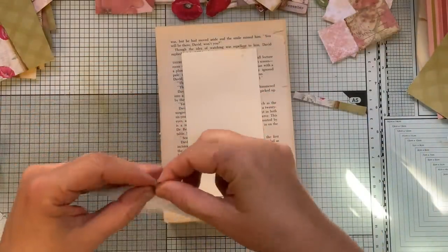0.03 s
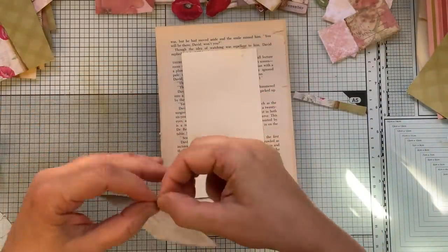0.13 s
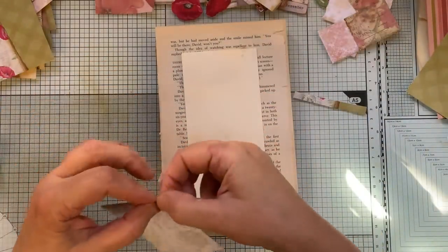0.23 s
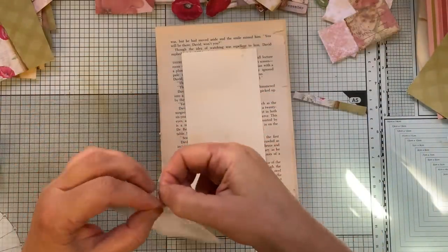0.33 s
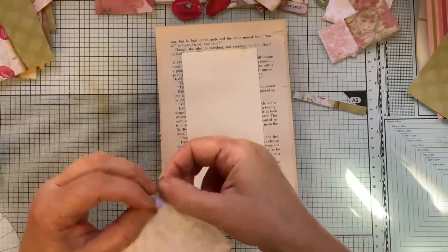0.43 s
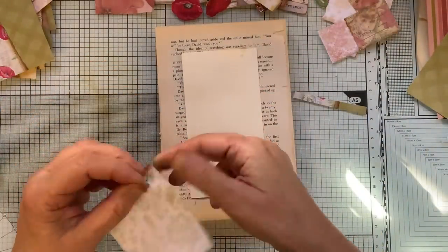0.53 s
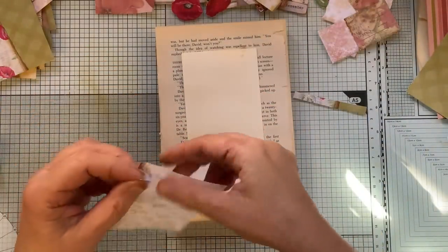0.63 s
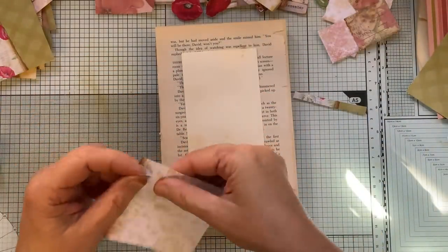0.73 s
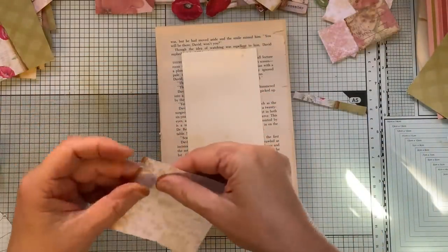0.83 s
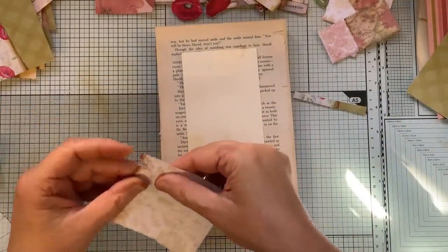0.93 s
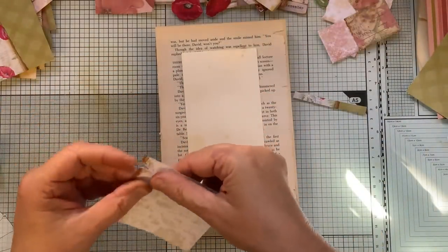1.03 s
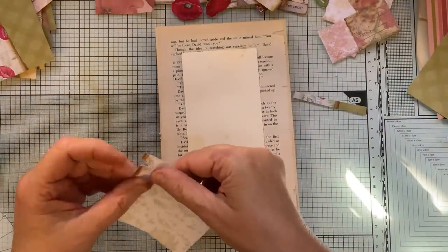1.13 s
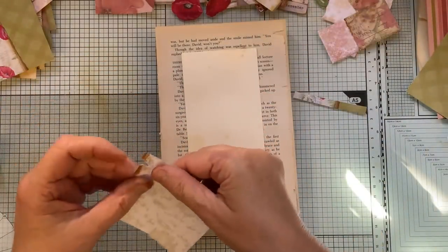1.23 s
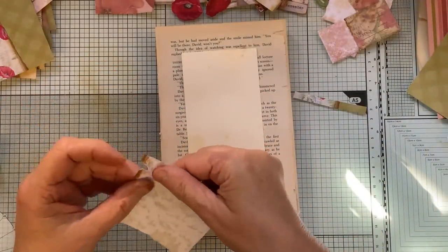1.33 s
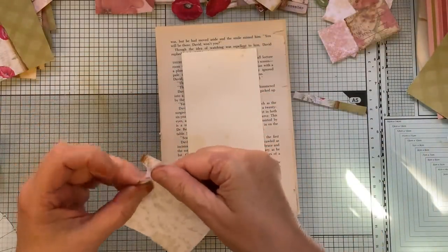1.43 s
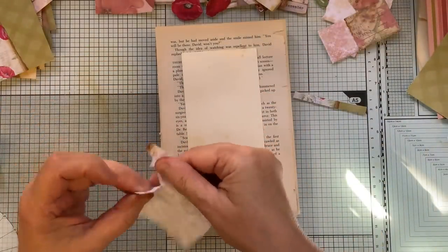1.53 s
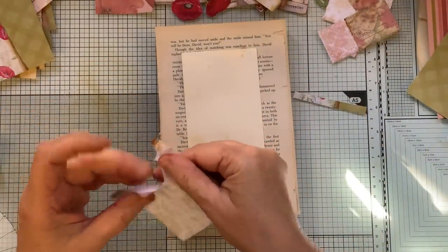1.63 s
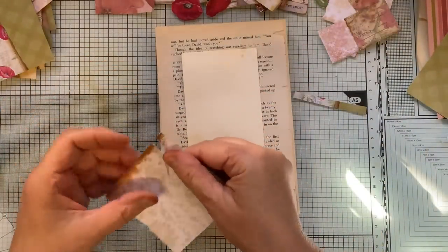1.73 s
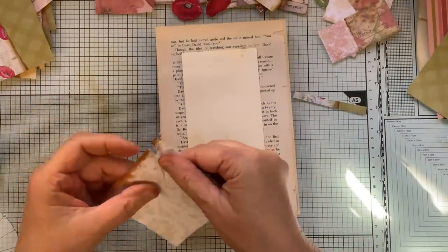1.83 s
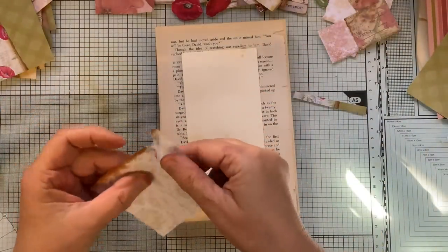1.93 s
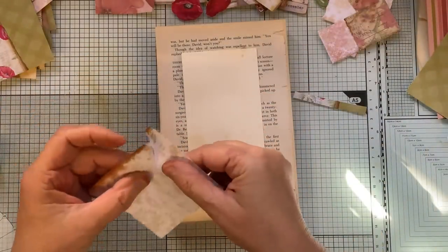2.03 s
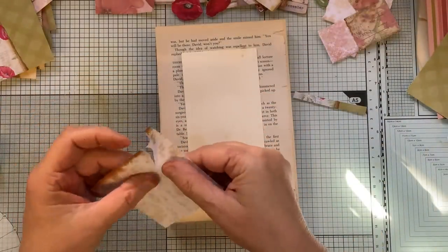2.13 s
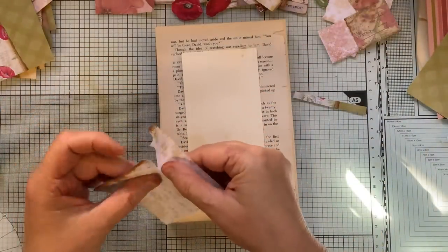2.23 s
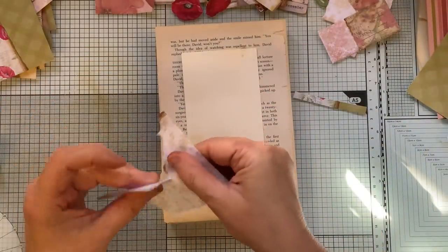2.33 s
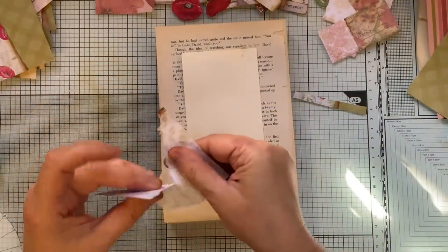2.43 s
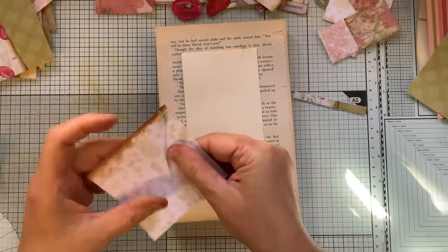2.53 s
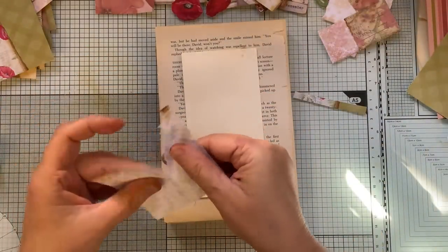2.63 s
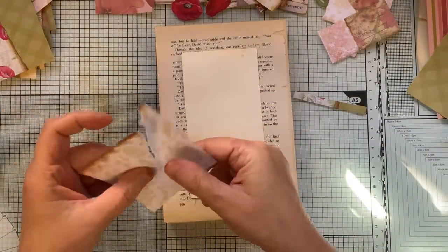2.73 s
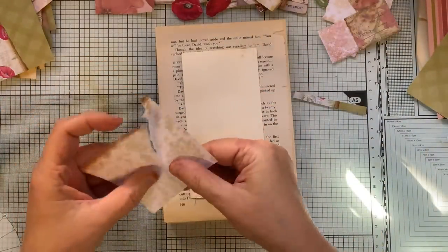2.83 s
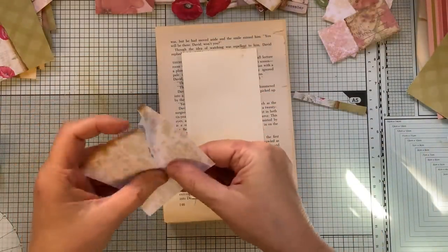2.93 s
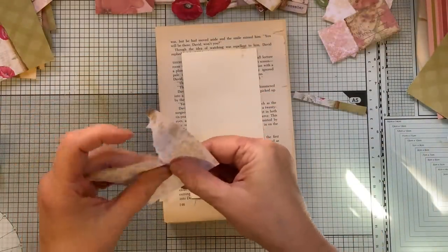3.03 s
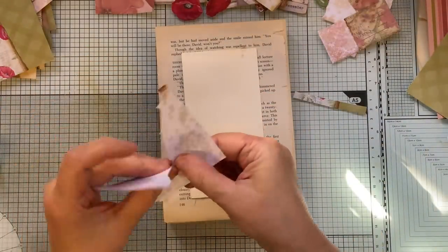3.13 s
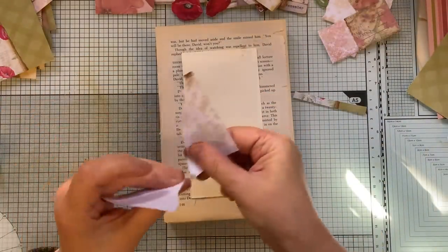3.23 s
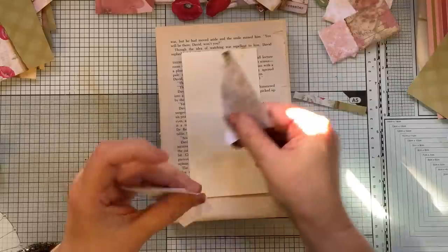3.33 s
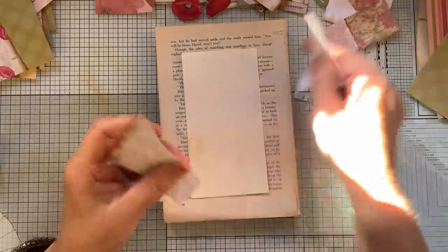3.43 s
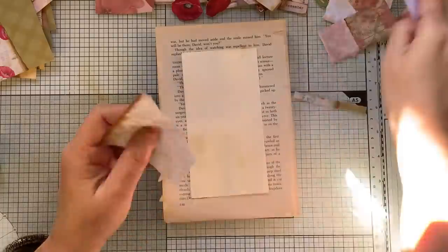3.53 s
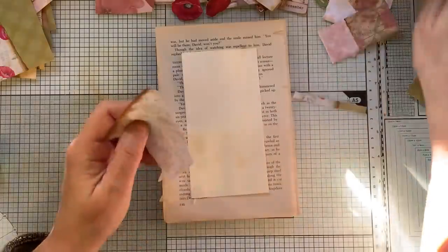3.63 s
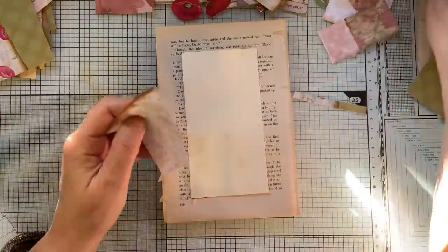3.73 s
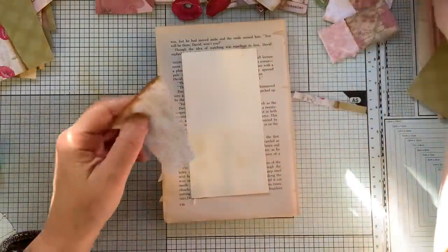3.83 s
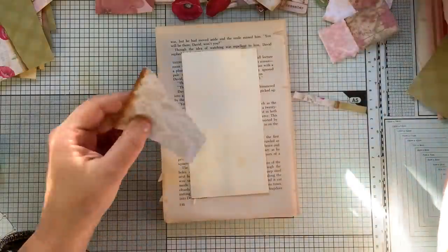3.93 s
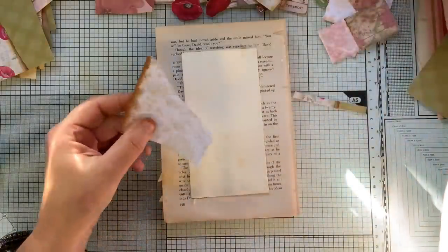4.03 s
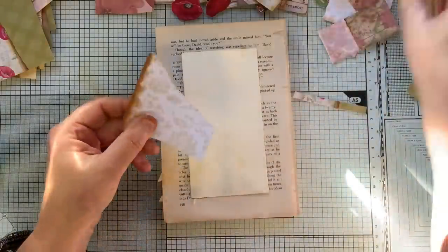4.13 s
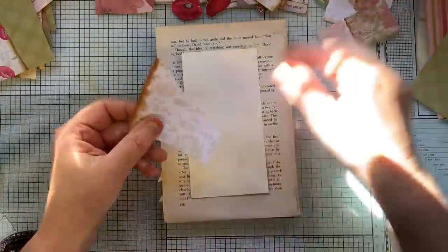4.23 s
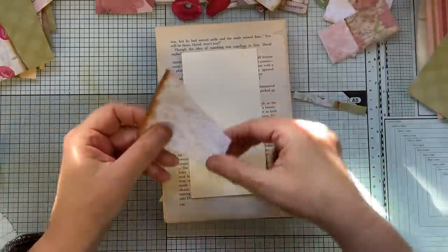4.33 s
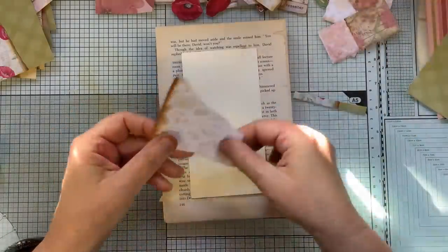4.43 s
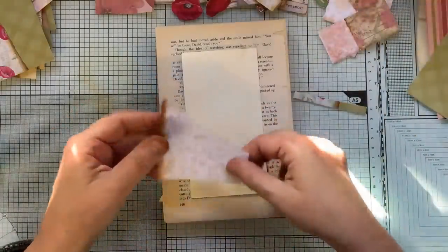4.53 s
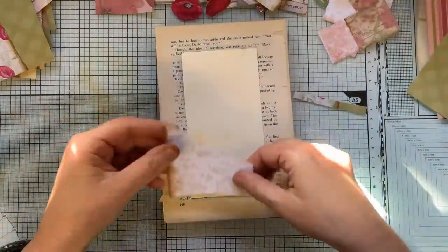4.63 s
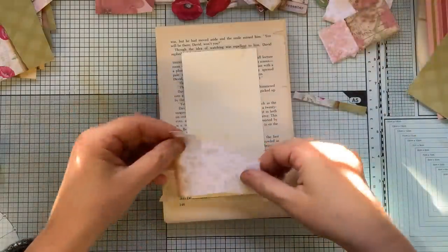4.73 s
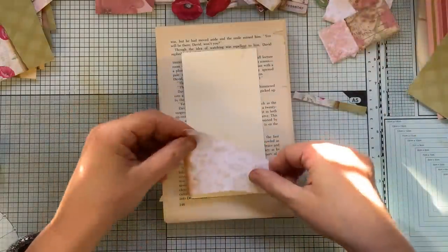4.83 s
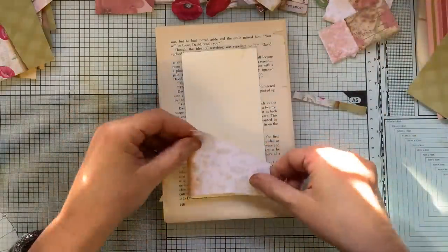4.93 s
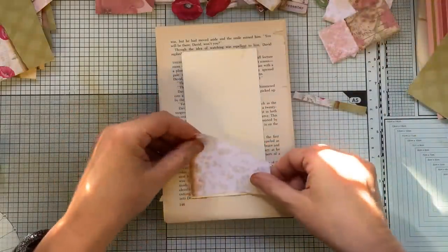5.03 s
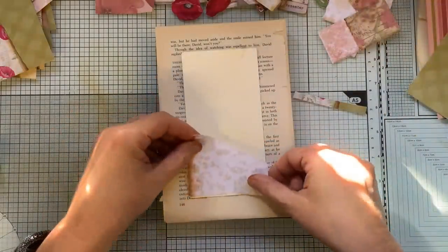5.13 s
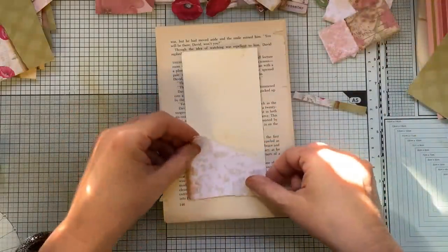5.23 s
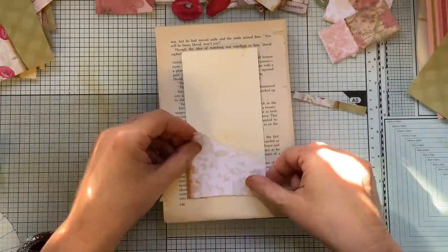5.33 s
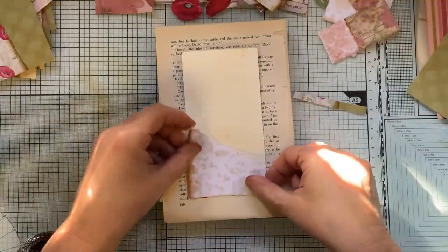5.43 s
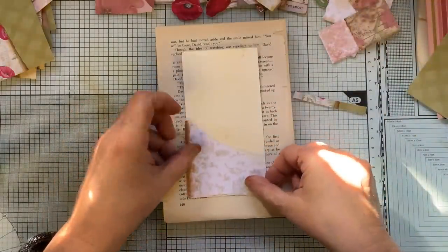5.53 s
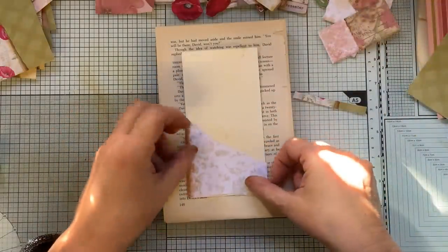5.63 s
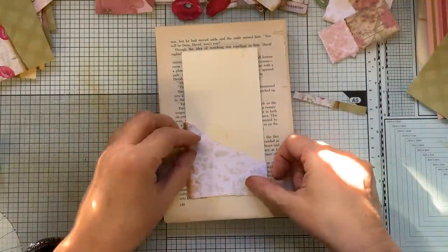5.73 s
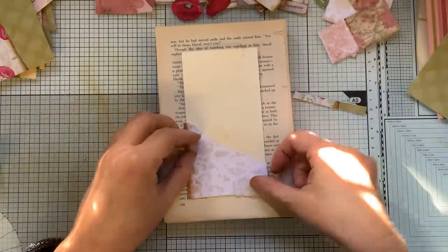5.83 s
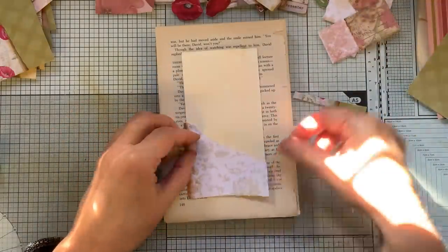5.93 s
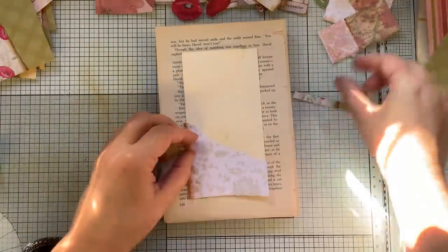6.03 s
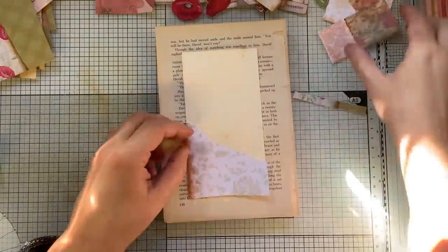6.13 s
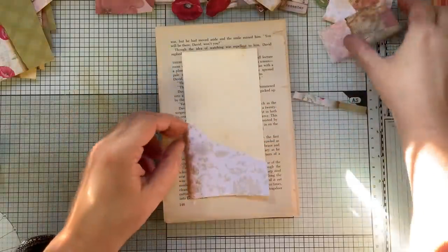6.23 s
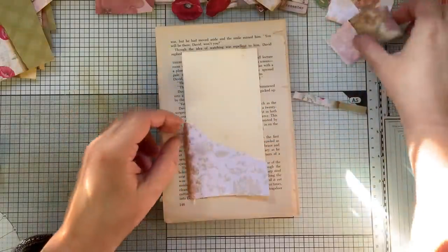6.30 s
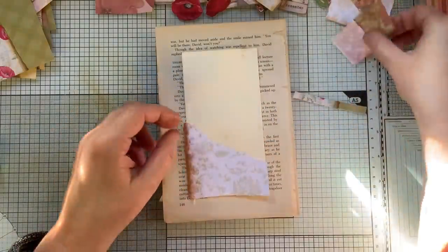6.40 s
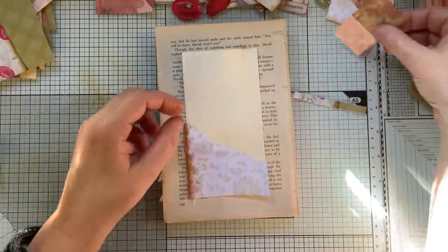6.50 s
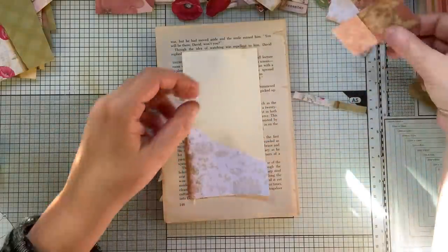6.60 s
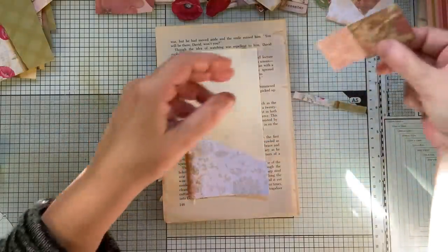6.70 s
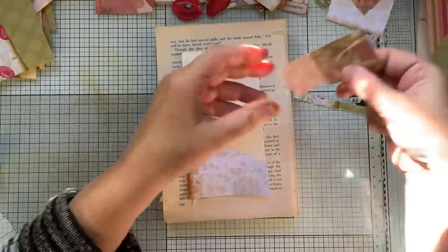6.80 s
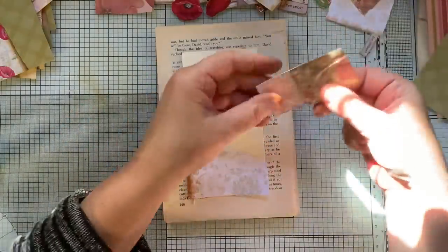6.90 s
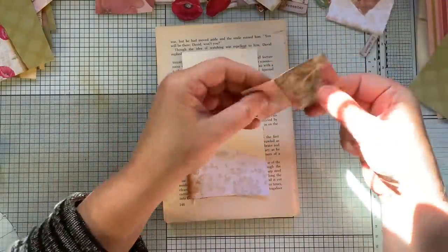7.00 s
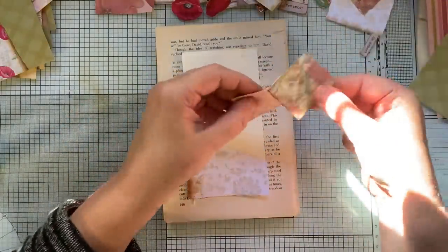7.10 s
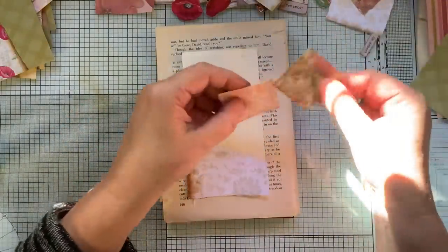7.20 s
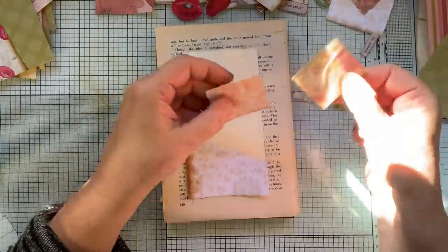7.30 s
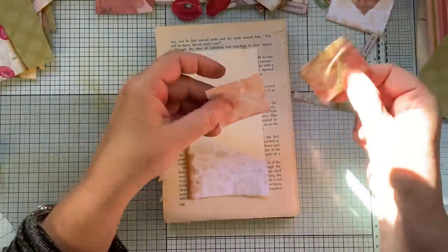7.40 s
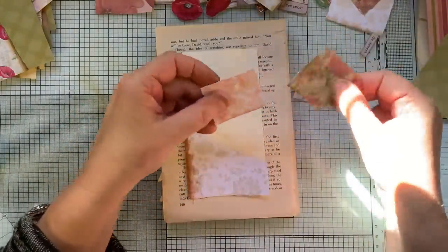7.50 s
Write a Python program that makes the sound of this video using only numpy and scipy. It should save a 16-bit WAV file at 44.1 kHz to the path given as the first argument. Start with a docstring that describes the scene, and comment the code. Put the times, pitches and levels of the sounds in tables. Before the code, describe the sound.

Close, crisp paper tearing in short uneven rips with sharp crease snaps, then soft rustling, a few dull table bumps and one last small rip.

```python
"""A faint room hum and a light rustle, then hands tear a scrap of paper in short rips, lay it down and
pick up others, close under a phone above a craft table. Fibres break as bursts of filtered noise,
creases snap as short ringing cracks, and the flexing sheet flaps low over a rumble of sleeve and table.
Wrist and scraps bump the table, heard as decaying sine modes; short noise tails spill from the walls."""
import sys
import numpy as np
from scipy import signal
from scipy.fft import rfft, irfft
from scipy.io import wavfile
from scipy.ndimage import uniform_filter1d

SR = 44100
rng = np.random.default_rng(int(sys.argv[2]) if len(sys.argv) > 2 else 0)


def waveform_to_disk(signal):
    """Save audio, clipped to [-1, 1], as 16-bit WAV at the path in sys.argv[1]."""
    frames = np.transpose(np.atleast_2d(signal))
    scaled = np.clip(frames, -1, 1) * 32767
    samples = np.round(scaled).astype(np.int16)
    wavfile.write(sys.argv[1], SR, samples)


def linear_from_db(decibels):
    """Turn decibels (scalar or array-like) into linear amplitude factors; 0 gives 1."""
    return 10 ** (np.asarray(decibels, float) / 20)


N = 333396
T = np.arange(N) / SR
STEPS = T[::32]  # gesture levels are worked out on this coarser clock
HZ = np.fft.rfftfreq(N, 1 / SR) + 1e-3  # kept above zero for the logarithms


def noise(size=N):
    """Two unrelated noises: the straight path and what scatters off hands and table."""
    return rng.standard_normal((2, size))


def over_frequency(points, column=1):
    """One column of a frequency table, read on a log axis."""
    p = np.array(points, float)
    return np.interp(np.log(HZ), np.log(p[:, 0]), p[:, column])


def over_time(points):
    """Columns of a time table, one value a sample."""
    s, *columns = np.array(points, float).T
    return [np.interp(T, s, c) for c in columns]


def colour(x, points, skirt_db=30):
    """Shape a sound by (Hz, dB) points, falling by skirt_db per octave outside; rms 1."""
    below = np.maximum(np.log2(points[0][0] / HZ), 0)
    above = np.maximum(np.log2(HZ / points[-1][0]), 0)
    gain = linear_from_db(over_frequency(points) - skirt_db * (below + above))
    y = irfft(rfft(x) * gain, N)
    return y / np.std(y)


def band(x, hz, width):
    """A resonance, gain 1 at its centre."""
    b, a = signal.iirpeak(min(hz, .45 * SR), max(hz / width, .3), SR)
    return signal.lfilter(b, a, x)


def walk(rate):
    """Random levels held 1 / rate s and slewed twice; spread near 1."""
    k = int(SR / rate)
    held = np.repeat(rng.standard_normal(N // k + 1), k)
    slewed = uniform_filter1d(uniform_filter1d(held, k), k)
    return 1.2 * slewed[:N]


def together(*levels_db):
    """Level of several sounds heard at once: their powers add."""
    return 10 * np.log10(sum(10 ** (db / 10) for db in levels_db))


def swell(s, length, from_db, to_db, attack_s, fade_s):
    """Level of one gesture: a quick rise, a drift while it lasts, a fade; times are for 60 dB."""
    drift = np.interp(STEPS, [s, s + length], [from_db, to_db])
    rise = 60 * np.maximum(s - STEPS, 0) / attack_s
    fade = 60 * np.maximum(STEPS - s - length, 0) / fade_s
    return drift - rise - fade


def room():
    """Still air as noise with a low rumble, and a mains hum of steady tones under wavering narrow noise."""
    # Air of the room. Each row: Hz, relative dB.
    air_tone = [(18, -41.5), (30, -11), (55, 1.5), (101, -2), (257, -25), (1900, -30), (2150, -50.5),
                (2560, -39), (2970, -28.5), (7590, -40.5), (11000, -38.5), (14300, -64), (22000, -120)]
    # Hum partials. Each row: Hz, level in dB, width in Hz of each of the two resonances in series.
    hum_tones = [(100.6, -67.5, 19), (203, -80, 14)]
    air = colour(noise(), air_tone) * linear_from_db(-66 + walk(3))
    hum = 0
    for hz, db, width in hum_tones:
        waver = band(band(noise(), hz, width), hz, width)
        tone = np.sin(2 * np.pi * hz * T) + 1.5 * waver / np.std(waver)
        hum = hum + linear_from_db(db + 1.3 * walk(6.7)) * tone
    return air + hum


def bumps():
    """Each blow rings the table top, whose pitch sags a little; hard blows favour the upper modes."""
    # Wrist and scraps on the table. Each row: start in seconds, relative level in dB,
    # hardness in dB per octave, damping by the hand 0-1.
    blows = [(5.968, -57, 12, 0.31), (6.095, -50.5, 16, 0.83), (6.119, -46.5, -16.5, 0.22),
             (6.222, -31, 1.5, 0.44), (7.03, -29, 3.5, 0), (7.104, -30.5, 1.5, 0.65)]
    # Modes of the table top. Each row: starting Hz, relative dB, undamped 60 dB decay in seconds.
    modes = [(78.9, -0.5, 0.25), (114, -2.5, 0.24), (162, 6.5, 0.082), (260.4, -6, 0.12),
             (294.6, 0.5, 0.14), (400, -20.5, 0.11), (681, -11, 0.034)]
    out = np.zeros(N)
    for s, db, hard_db, damp in blows:
        t = np.maximum(T - s, 0)
        sagging = t * (1 - 0.43 * np.minimum(t, .4))
        for hz, mode_db, t60 in modes:
            damped_t60 = t60 * (1 - np.clip(damp, 0, .9))
            fall = (1 - np.exp(-t / 0.0025)) * np.exp(-np.log(1000) * t / damped_t60)
            level = linear_from_db(db + mode_db + hard_db * np.log2(hz / 160))
            out += level * np.sin(2 * np.pi * hz * sagging) * fall
    return out


def breaks(per_s, spread_db, fade_s):
    """Envelope of fibres giving way at random, a few far louder, each dying quickly; rms 1."""
    when, how_big = rng.random((2, N))
    size = (when < per_s / SR) * linear_from_db(-spread_db * np.log(1 - .985 * how_big))
    e = signal.lfilter([1], [1, -np.exp(-1 / (fade_s * SR))], size)
    return e / np.sqrt(np.mean(e ** 2))


def patches(x, hz, count, swing_db, per_s):
    """Narrow resonances of the bent sheet round a centre, trading strength as the fingers reshape it."""
    gains = np.array([linear_from_db(swing_db * walk(per_s)) for _ in range(count)])
    gains = gains / np.sqrt(np.mean(gains ** 2, axis=0))
    centres = hz * 2 ** np.linspace(-.27, .27, count)
    out = 0
    for f, gain in zip(centres, gains):
        width = 1.2 * f / count
        out = out + band(band(x, f, width), f, width) * gain
    return out


def effort():
    """Level of all strokes of tearing and rubbing heard together."""
    # Each row: start in seconds, length in seconds, relative dB at the start, at the end,
    # time in seconds to fade by 60 dB.
    strokes = [(0.183, 0.083, -44, -56.5, 0.12), (0.261, 0.054, -51, -27, 0.12),
               (0.384, 0.0063, -47.5, -37, 0.18), (0.512, 0.046, -62, -53, 0.16),
               (0.631, 0.049, -51, -59.5, 0.09), (0.695, 0.019, -47, -41, 0.18),
               (.788, 0.0097, -51, -48, 0.18), (0.876, 0.055, -47, -54.5, 0.44),
               (1.112, 0.022, -55, -47, 0.063), (1.288, 0.0024, -42.5, -31.5, 0.025),
               (1.327, 0.013, -32, -33.5, 0.51), (1.38, 0.063, -32, -19.5, 0.079),
               (1.667, 0.061, -50, -43, 0.057), (1.749, 0.12, -53.5, -45.5, 0.035),
               (1.889, 0.0068, -42, -45, 0.038), (1.907, 0.053, -57.5, -49, 0.41),
               (2.071, 0.083, -51.5, -47, 0.15), (2.176, 0.035, -27.5, -25, 0.026),
               (2.225, .036, -21, -21, 0.057), (2.359, 0.01, -47, -39, 0.037),
               (2.464, 0.032, -55, -44, 0.025), (2.513, 0.017, -52.5, -47, 0.31),
               (2.559, 0.021, -48, -42.5, 0.19), (2.684, 0.1, -49, -47.5, 0.23),
               (2.839, 0.028, -59, -54, 0.55), (2.96, 0.038, -51, -30.5, 0.22),
               (3.04, 0.027, -43.5, -37.5, 0.062), (3.089, 0.063, -27, -19, 0.023),
               (3.238, 0.12, -48.5, -42.5, 0.13), (3.376, 0.071, -34.5, -46, 1),
               (3.595, 0.037, -52, -43, 0.57), (3.704, 0.019, -56, -42.5, 0.5),
               (3.885, 0.019, -50, -54.5, 0.34), (4.064, 0.02, -56.5, -57, 0.5),
               (4.27, 0.12, -47, -48.5, 0.039), (4.514, 0.011, -64, -62.5, 0.45),
               (4.613, 0.03, -55.5, -53.5, 0.24), (4.733, 0.014, -57.5, -51.5, 0.38),
               (4.886, 0.076, -64.5, -65, 0.094), (4.991, 0.07, -50.5, -48, 0.57),
               (5.298, 0.038, -59.5, -52.5, 1), (5.471, 0.0034, -42, -37, 0.048),
               (5.516, 0.0063, -55.5, -54.5, 0.26), (5.673, 0.0056, -66.5, -65, 0.4),
               (6.148, 0.1, -48, -52, .1), (6.23, 0.0073, -30, -25.5, 0.048),
               (6.269, 0.12, -53, -57.5, 0.11), (6.453, 0.15, -64.5, -62.5, 0.41),
               (6.829, 0.086, -58, -50, 0.13), (7.027, 0.031, -55, -58.5, 0.058),
               (7.064, 0.014, -43.5, -36, 0.054), (7.113, 0.13, -57, -58.5, .4),
               (7.392, 0.07, -64, -48, 0.31)]
    swells = [swell(s, length, from_db, to_db, 0.025, fade_s)
              for s, length, from_db, to_db, fade_s in strokes]
    return np.interp(T, STEPS, together(*swells))


def flexing():
    """Levels of the flapping as the whole sheet flexes, and of the rumble that comes with it."""
    # Each row: start in seconds, length in seconds, flapping in relative dB,
    # sleeve and table rumble in dB above it, time in seconds to fade by 60 dB.
    flexes = [(0, 0.036, -62.5, -3, 0.1), (0.188, 0.085, -54.5, -14, 0.44),
              (0.283, 0.06, -47.5, -8.5, 0.24), (0.375, 0.015, -41.5, -14.5, 0.081),
              (0.42, 0.0036, -36, -21, 0.13), (0.505, 0.039, -49, -13.5, 0.13),
              (0.643, 0.013, -40.5, -14.5, 0.056), (0.687, 0.011, -40.5, -5.5, 0.26),
              (0.788, 0.055, -56.5, -1, 0.073), (0.967, 0.019, -64, 2, 0.13), (1.299, 0.077, -52, -5.5, .2),
              (1.391, 0.06, -43.5, -12.5, 0.26), (1.538, 0.022, -38, -7, 0.1),
              (1.67, 0.038, -60.5, -4, 0.2), (1.775, 0.0044, -50, -14, 0.17),
              (1.857, 0.048, -49.5, -4, 0.19), (2.054, 0.0057, -65, 5.5, 0.27),
              (2.183, 0.12, -47.5, -16, 0.083), (2.357, 0.037, -49, -3.5, 0.43),
              (2.411, 0.13, -55, -3, 0.4), (2.576, 0.021, -46.5, -2, 0.17), (2.66, 0.04, -60, 0, 0.93),
              (2.96, 0.029, -54.5, -1.5, 1), (3.148, 0.0047, -41, -3.5, 0.042),
              (3.345, 0.035, -42, -5.5, 0.19), (3.62, 0.009, -67, 6, 0.36), (4.043, 0.12, -66, 4.5, 0.54),
              (4.269, 0.018, -63, 2.5, 0.99), (5.045, 0.021, -76, 11.5, 0.39),
              (6.101, 0.0068, -54.5, 6.5, 0.22), (6.218, 0.014, -51, 6.5, 0.17),
              (6.61, 0.025, -67, 5.5, 0.15), (6.803, 0.016, -61.5, 9.5, 0.23),
              (7.024, 0.028, -58.5, 17, 0.67), (7.098, 0.29, -72.5, 14, 0.89)]
    still_db = -81
    flaps = [swell(s, length, db, db, 0.035, fade_s) for s, length, db, _, fade_s in flexes]
    rumbles = [f + row[3] for f, row in zip(flaps, flexes)]
    return [np.interp(T, STEPS, together(still_db, *layer)) for layer in (flaps, rumbles)]


def rumble(level_db):
    """Sleeve and table rumble: low noise of unsteady level."""
    # Each row: Hz, relative dB.
    rumble_tone = [(140, -1), (250, -0.5), (400, -4)]
    return colour(noise() * linear_from_db(2 * walk(28)), rumble_tone) * linear_from_db(level_db)


def flap(level_db):
    """The sheet flaps: low noise with slow, sparse breaks."""
    # Each row: Hz, relative dB.
    flap_tone = [(380, 1), (500, 5), (700, -2), (950, -6.5)]
    return colour(noise() * (.5 + 0.99 * breaks(70, 1.3, 0.0092)), flap_tone) * linear_from_db(level_db)


def sheet(level_db, fibres, jerks):
    """Middle rustle: the breaking fibres shake the resonances of the sheet."""
    # Each row: Hz, relative dB.
    sheet_tone = [(600, -22.5), (900, -1), (1400, 7), (1700, 7), (2200, 2.5)]
    shaken = noise() * (0.52 + 0.54 * fibres) * jerks
    middle = sum(patches(shaken, hz, count=4, swing_db=5, per_s=18) for hz in (720, 1170, 1900))
    return colour(middle, sheet_tone) * linear_from_db(level_db)


def crackle(level_db, bright_db, fibres, jerks):
    """Tearing and rubbing: breaks over smooth noise, in five bands that share some of their breaks."""
    # Each row: Hz, relative dB.
    paper_tone = [(2000, -8), (3000, -5), (4000, -2.5), (5500, 2.5), (8000, 1), (11500, 3.5), (14000, 5.5),
                  (15600, 1)]
    tearing = np.clip((level_db + 75) / 35, .5, 1)  # light rubbing is smooth, hard tearing is grainy
    top = 0
    for hz in (2722, 3680, 6800, 8866, 15400):
        grain = .4 + tearing * (.7 * fibres + .5 * breaks(400, 4.5, .0006))
        tilt_db = 1.18 * bright_db * np.clip(np.log2(hz / 6300), -.6, .6)
        part = patches(noise() * grain, hz, count=8, swing_db=6, per_s=20)
        top = top + part * linear_from_db(tilt_db) / np.sqrt(hz)
    return colour(top * jerks, paper_tone) * linear_from_db(level_db + 3.5)


def snaps():
    """Each crease: a broad crack, a short ring of the sheet and a duller body that lasts longer."""
    # Creases that snap. Each row: start in seconds, crack peak in relative dB, body in dB above it,
    # ring in Hz, 60 dB fade of crack and ring in seconds (held to at least 0.003).
    creases = [(0.182, -30.5, -24, 8300, 0.096), (0.3198, -15, -24, 6500, 0.012),
               (0.417, -7.5, -40, 6530, 0.017), (0.517, -28.5, -17, 3460, 0.026),
               (0.632, -23.5, -14, 5200, 0.0062), (0.6858, -25, 3.5, 4870, 0.0048),
               (0.7019, -9.5, -15.5, 5470, 0.025), (1.296, -9.5, -39, 7400, 0.04),
               (1.311, -14, -36, 7000, 0.008), (1.3566, -14, -21, 3000, 0.014),
               (1.444, -9, -32, 5800, 0.012), (1.4535, 3, -39, 3350, 0.016),
               (1.5356, -17.5, -7.5, 4400, 0.024), (1.5468, -16.5, -29, 6760, 0.0071),
               (1.7735, -22, -9.5, 6840, 0.023), (2.1767, -8, -40, 7640, 0.023),
               (2.2228, 0, -34, 6800, 0.029), (2.2724, 2, -30, 7300, 0.023),
               (2.3413, -18.5, -27, 7840, 0.02), (2.3583, -21, -16, 3380, 0.042),
               (2.4117, -18, -14, 5900, 0.024), (2.5272, -13.5, -26, 8600, 0.012),
               (2.5633, -26.5, -1, 5880, 0.0098), (2.9935, -25, -40.5, 7400, 0.027),
               (3.0746, -6, -59, 10500, 0.036), (3.0944, -15, -37, 6000, 0.0071),
               (3.1162, -13, -28, 5560, 0.007), (3.1226, -4, -20, 7000, 0.0068),
               (3.14, -3, -17, 6000, 0.011), (3.1446, -2, -21, 8000, 0.028),
               (3.2487, -23.5, -15, 8900, 0.028), (3.358, -8.5, -16.5, 4330, 0.014),
               (3.3794, -1, -20.5, 4840, 0.015), (4.0352, -13, -21.5, 3600, 0.019),
               (4.2719, -20.5, -14, 5000, 0.016), (4.277, -24, -5, 5720, 0.0075),
               (4.5114, -40, -5.5, 5960, 0.03), (4.551, -40, -2.5, 4680, 0.024),
               (4.995, -35, -37.5, 3440, 0.025), (5.06, -33.5, 8, 6640, 0.008),
               (5.3642, -18.5, -60, 9500, 0.033), (5.4797, -9, -33, 6840, 0.028),
               (5.82, -44.5, -25, 5970, 0.017), (6.138, -24.5, -19, 8090, 0.0082),
               (6.168, -26, -6, 3380, 0.012), (6.1998, -19, -13, 3360, 0.0094),
               (6.2279, -15.5, -9, 3060, 0.012), (6.2342, -11.5, -4.5, 4640, 0.013),
               (6.794, -48, -1, 3530, 0.015), (6.8209, -25, -21, 6000, 0.026),
               (6.912, -33, -28, 6900, 0.012), (6.9329, -15.5, -26, 5360, 0.01),
               (7.0715, -13.5, -6, 5080, 0.015), (7.259, -35, -16, 7000, 0.04)]
    size = 4096
    out = np.zeros((2, N + size))
    t = T[:size]
    click = (np.arange(size) == 12) * np.array([[1], [.3]])  # the fold gives way at once
    for s, db, low_db, hz, fade_s in creases:
        fall = np.exp(-np.log(1000) * t / max(fade_s, .003)) * (1 - np.exp(-t / .00025))
        jolt = noise(size) + 8 * click
        crack = (band(jolt, 10000, 15000) + 2 * band(jolt, hz, .2 * hz)) * fall
        body = band(band(jolt, 2600, 1400) + 0.82 * band(jolt, 1400, 400), 1800, 2900)
        body = body * 1.65 * fall ** 0.31
        i = int(s * SR)
        out[:, i:i + size] += linear_from_db(db) * (crack / np.abs(crack[0]).max() + linear_from_db(low_db) * body)
    return out[:, :N]


def paper():
    """Crackle over a smooth rustle; the sheet answers lower and slower, partly in step."""
    # Fingers resting on the paper. Each row: time in seconds, rustle in relative dB,
    # brightness (higher tilts towards treble), middle rustle in dB above the flapping.
    touch = [(0, -62.5, 2.5, -14), (.06, -85.5, 10, -12), (.2, -81.5, 9.5, -11), (.6, -78.5, -3, -5),
             (.9, -65.5, 2, -1), (1.16, -58.5, 5, 14.5), (1.55, -54.5, -3.5, -12), (1.65, -88, 0.5, 0),
             (2.0, -61, 2, 2), (2.4, -72.5, 1.5, -4.5), (3.1, -62, 3, 5), (3.5, -57.5, 5, -8),
             (4.0, -63.5, 0, 4), (4.25, -82.5, 1.5, -0.5), (4.75, -73, -9, 14), (5.5, -88, 1, -8),
             (6.2, -74, 1, 2.5), (6.9, -90, 0.5, -0.5), (7.0, -85.5, -6, 10), (7.56, -75, -2, 3)]
    touch_db, bright_db, stiff_db = over_time(touch)
    crackle_db = together(effort(), touch_db)
    flap_db, rumble_db = flexing()
    slow_db = uniform_filter1d(crackle_db, size=9000)
    follow_db = 0.58 * (crackle_db - slow_db)
    sheet_db = together(flap_db + stiff_db, slow_db - 15)
    jerks = linear_from_db(2 * walk(90))  # the tear runs in uneven jerks
    fibres = breaks(700, 5, 0.0023)
    return (crackle(crackle_db, bright_db, fibres, jerks) + sheet(sheet_db + follow_db, fibres, jerks)
            + flap(flap_db + follow_db) + rumble(rumble_db + .5 * follow_db))


def wall_spill(near):
    """Short spill from the walls: the close sound smeared by noise that falls 60 dB in 0.17 s."""
    t = T[:8000]
    tail = noise(size=8000) * np.exp(-np.log(1000) * t / 0.17) * (t > .002)
    tail = tail / np.linalg.norm(tail[0])
    return linear_from_db(-14.0) * signal.fftconvolve(near, tail, axes=1)[:, :N]


def stereo_image(paths):
    """Left and right: the phase between them steps with pitch and their levels differ; scattered sound enters
    them with opposite signs."""
    # Each row: Hz, half turns the right lags, left minus right in dB, unshared part of the power 0-1.
    ports = [(100, 0, .3, .003), (350, -.1, -3, .03), (600, -.2, -8, .2), (900, .1, -4, .15),
             (1250, 0, 1, .06), (1900, .55, 0, .03), (2300, .93, 0, .001), (2640, 1.07, 0, .001),
             (3000, 1.65, .5, .04), (3500, 1.98, .5, .005), (4600, 2.01, 0, .002), (5500, 2.15, .5, .06),
             (8500, 2.33, 0, .08), (11000, 2.6, -.5, .09), (11900, 2.86, 0, .04), (12600, 2.97, 0, .006),
             (16000, 3.01, 0, .005)]
    straight, scattered = rfft(paths)
    turn = np.exp(.5j * np.pi * over_frequency(ports)) * linear_from_db(over_frequency(ports, column=2) / 2)
    apart = over_frequency(ports, column=3)
    straight, scattered = straight * np.sqrt(1 - apart), scattered * np.sqrt(apart)
    return irfft(np.array([(straight + scattered) * turn, (straight - scattered) / turn]), N)


def scene():
    """Close paper with its spill from the walls, table bumps and room, spread to left and right."""
    near = paper() + snaps()
    return stereo_image(near + wall_spill(near) + bumps() + room())


def top_cut(x):
    """Nothing passes above the cut-off."""
    return signal.sosfilt(signal.butter(12, 16670, fs=SR, output="sos"), x)


def record(dry):
    """The phone cuts the top above 16.2 kHz and the deepest bass below 46 Hz, and clips at full scale."""
    x = signal.sosfilt(signal.ellip(8, .2, 40, 16200, fs=SR, output="sos"), dry)
    x = signal.sosfilt(signal.butter(4, 46, "high", fs=SR, output="sos"), x)
    return top_cut(np.clip(x, -1, 1))


dry = scene()
out = record(dry)
waveform_to_disk(out)
```